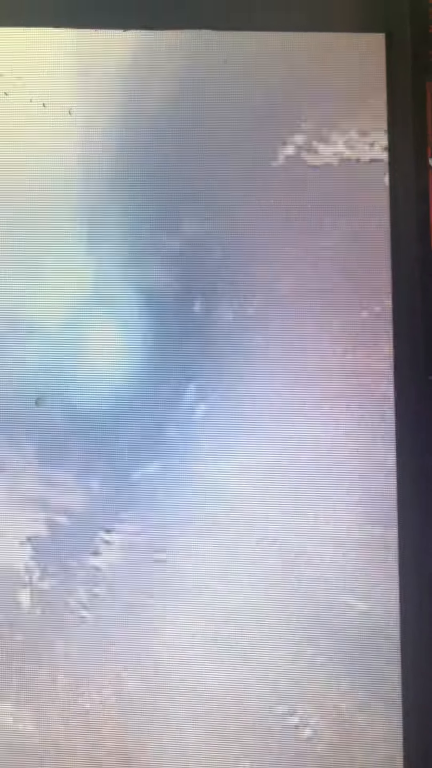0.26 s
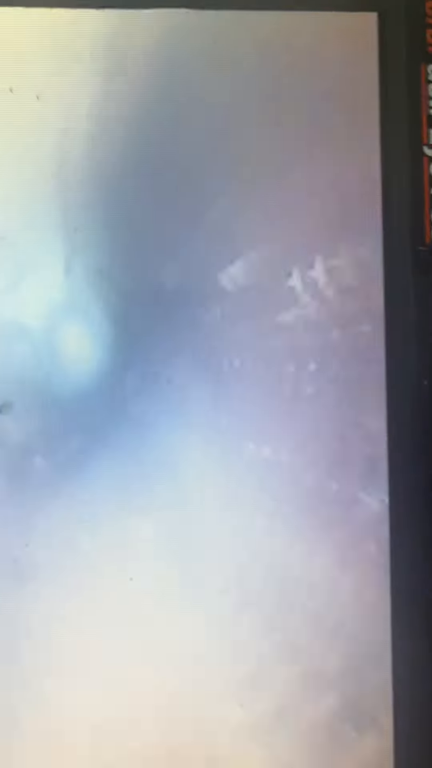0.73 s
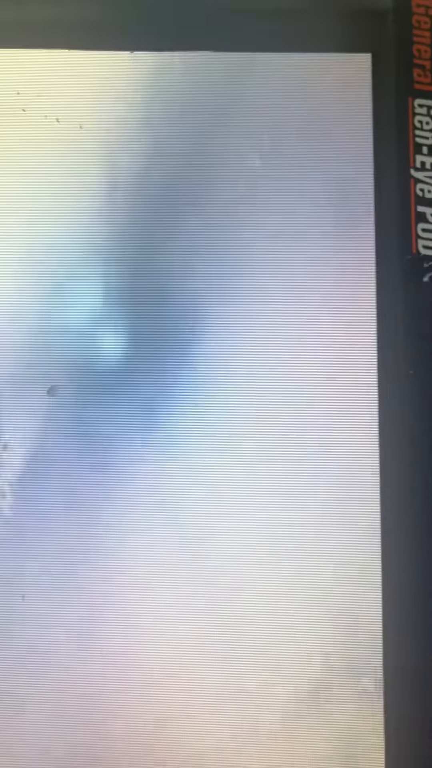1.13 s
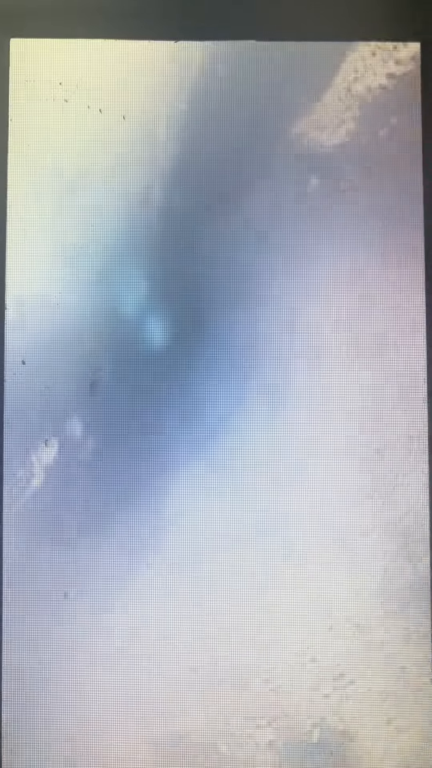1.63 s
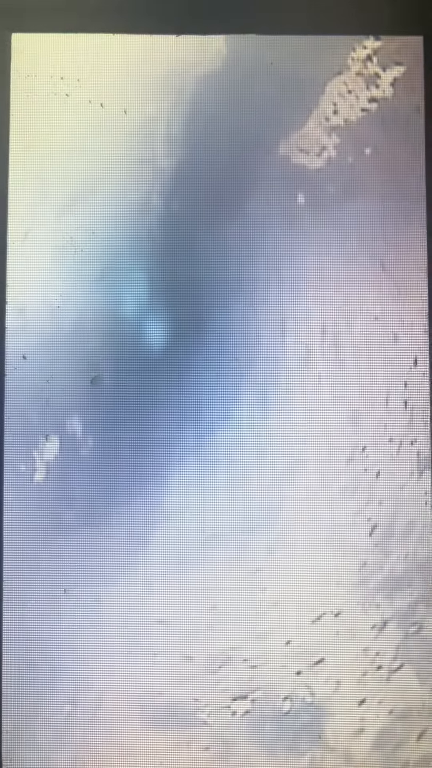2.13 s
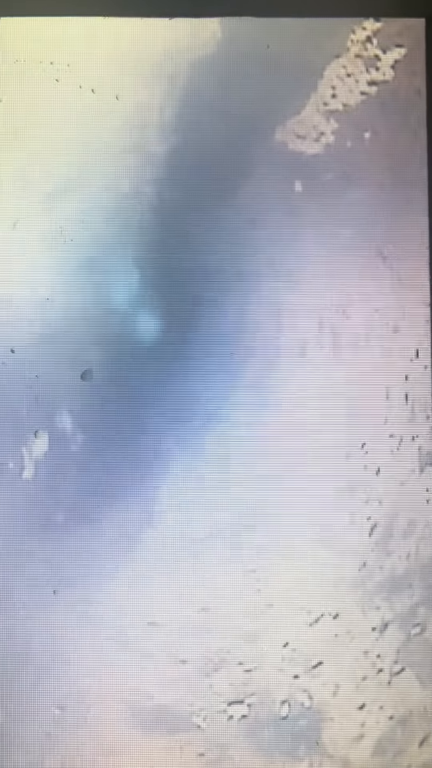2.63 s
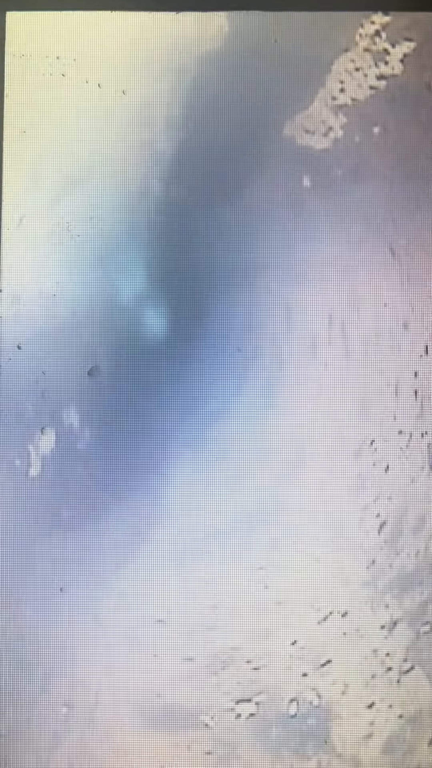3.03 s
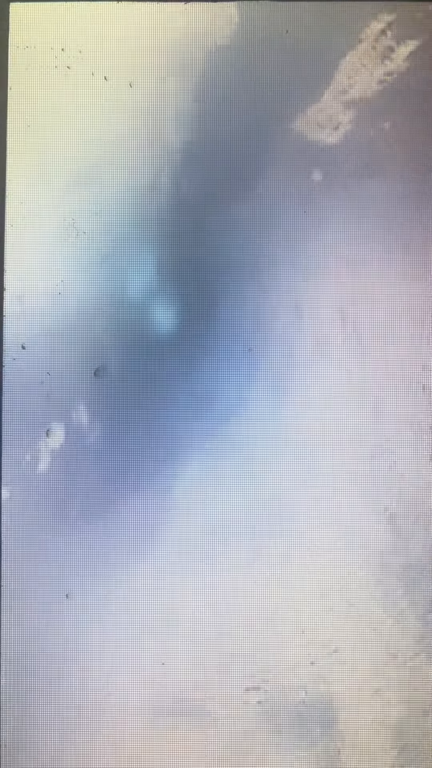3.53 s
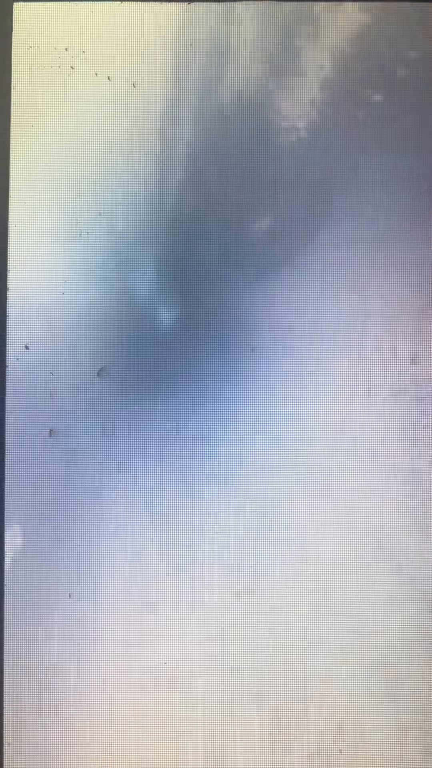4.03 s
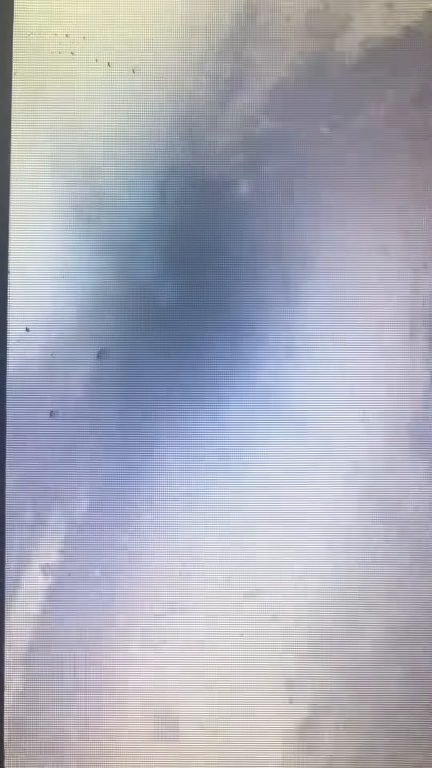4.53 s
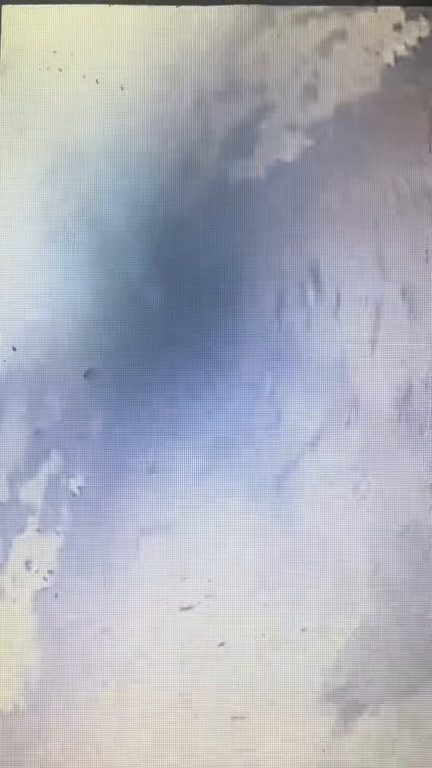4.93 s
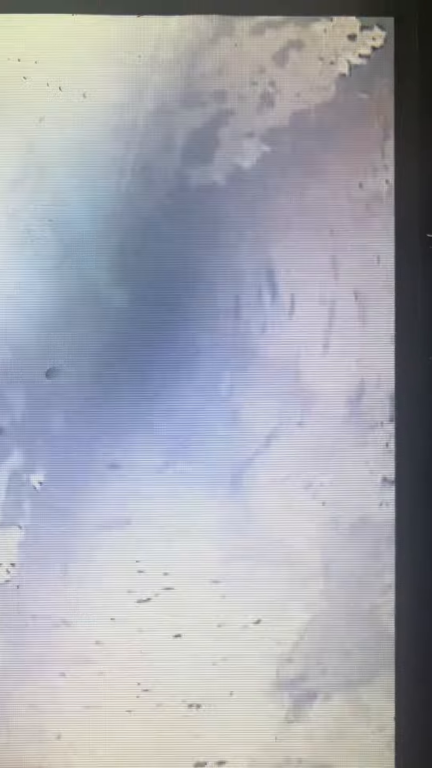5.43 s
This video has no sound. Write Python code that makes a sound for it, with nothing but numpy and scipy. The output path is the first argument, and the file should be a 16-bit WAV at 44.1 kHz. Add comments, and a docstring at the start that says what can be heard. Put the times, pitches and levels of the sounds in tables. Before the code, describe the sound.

A drain cable scrapes along a hollow pipe mouth in two clear pulls, the second shorter and louder, with a quieter stretch of light rubbing between them. Irregular springy slaps and knocks come from the cable hitting its reel, mixed with sharp ticks of grit and three low thuds. The sounds are near the microphone in a small, fairly dry room, with constant hiss and a low rumble underneath.

```python
"""Drain cable and reel

A springy push cable is drawn by hand out of a drain and fed back onto its reel in a small room. Each pull rubs
it along the hollow pipe mouth. It slaps the reel, and the slaps run down the cable as short falling chirps.
Grit ticks and crunches, slack loops knock and dull low thuds sound, all over a low rumble and a steady hiss."""
import sys
import numpy as np
from scipy import signal
from scipy.fft import rfft, irfft, next_fast_len
from scipy.io import wavfile
from scipy.ndimage import uniform_filter1d

SR = 44100
rng = np.random.default_rng(int(sys.argv[2]) if len(sys.argv) > 2 else 0)


def output_pcm(signal):
    """Save a mono or channel-first signal as 16-bit PCM at the path in sys.argv[1].

    Samples are clipped to [-1, 1] before scaling.
    """
    pcm = np.clip(np.atleast_2d(signal).T, -1, 1) * 32767
    wavfile.write(sys.argv[1], SR, np.round(pcm).astype(np.int16))


N = 249606
TIME = np.arange(N) / SR
FFT_SIZE = next_fast_len(N + SR)
HZ = np.maximum(np.arange(FFT_SIZE // 2 + 1) * SR / FFT_SIZE, 1)
TRAVEL_S = 0.003543   # sets how widely the bending waves spread on their way to the reel; a 1 kHz wave trails the front by about a third of this


def from_db(db):
    """Decibels to gain."""
    return 10 ** (np.asarray(db) / 20)


def rms_one(x):
    """Scale to rms 1."""
    return x / np.sqrt(np.mean(x ** 2) + 1e-20)


def steady(x, span_s):
    """Even out surges slower than span_s and leave the grain; rms about 1."""
    return x / np.sqrt(uniform_filter1d(x ** 2, int(span_s * SR)) + .05 * np.mean(x ** 2))


def over_hz(points):
    """Join a table's points by lines on a log-frequency axis."""
    hz, value = np.transpose(points)
    return np.interp(np.log(HZ), np.log(hz), value)


def filtered(x, response):
    """Pass x through a frequency response."""
    return irfft(rfft(x, FFT_SIZE) * response, FFT_SIZE)[..., :N]


def band(x, low_hz, high_hz):
    """Causal band-pass."""
    sos = signal.butter(2, [low_hz, min(high_hz, .45 * SR)], "band", fs=SR, output="sos")
    return signal.sosfilt(sos, x)


def minimum_phase(gain_db):
    """An EQ curve that sounds as early as it can, but never before its cause."""
    cepstrum = irfft(np.log(from_db(gain_db)))
    cepstrum[1:] *= 2
    cepstrum[len(cepstrum) // 2:] = 0
    return np.exp(rfft(cepstrum))


def drift(per_s):
    """A smooth random wander of rms 1."""
    return rms_one(filtered(rng.standard_normal(N), np.exp(-(HZ / per_s) ** 2)))


def grains(per_s, spread_db):
    """Clicks at random moments, a few far stronger than the rest."""
    sizes = from_db(spread_db * np.minimum(rng.exponential(1, N), 4)) * rng.choice([-1, 1], N)
    return sizes * (rng.random(N) < per_s / SR)


# The rumble's tone. Each row: frequency in Hz, relative level in dB.
RUMBLE_SPECTRUM = [(20, -41), (35, -25), (50, -1.5), (65, 0.5), (95, 2.5), (140, -5), (190, -6.5),
                   (260, -16), (500, -17.5), (1000, -32.5)]
def rumble(level_db=-36.5, pull_lift_db=2.0):
    """A low, steady bed that swells a little during a pull."""
    noise = filtered(rng.standard_normal(N), from_db(over_hz(RUMBLE_SPECTRUM)))
    return steady(noise, span_s=0.15) * from_db(level_db + pull_lift_db * pulling())


# The hiss's tone. Each row: frequency in Hz, relative level in dB.
HISS_SPECTRUM = [(200, 17), (900, -10), (1800, 8.5), (2300, 2.5), (3200, 11), (4200, 9), (5500, 8.5),
                 (7200, 6.5), (10000, 3), (14000, -0.5), (16000, -5)]
# Its stereo image. Each row: frequency in Hz, likeness of the sides from 0 (wide) to 1 (mono).
HISS_IMAGE = [(300, 0.73), (900, 0.061), (1600, 0.77), (3000, 1), (4200, 0.88), (6100, 1), (7500, 0.63),
              (9000, 0.98), (11000, 0.42), (12500, 1), (14200, 0.38), (15500, 0.3)]
def hiss(level_db=-46.5, flutter_db=2.5):
    """Broad hiss that flutters slightly, partly shared by the two sides."""
    alike = np.clip(over_hz(HISS_IMAGE), 0, .99)
    colour = from_db(over_hz(HISS_SPECTRUM))
    mid = filtered(rng.standard_normal(N), colour * np.sqrt(1 + alike))
    side = filtered(rng.standard_normal(N), colour * np.sqrt(1 - alike))
    return from_db(level_db + flutter_db * drift(per_s=25)) * rms_one(mid + side * [[1], [-1]])


# The ring of cable and reel. Each row: pitch in Hz, bandwidth in Hz, relative level in dB.
REEL_MODES = [(140.4, 9.8, 9.5), (183.4, 13.5, 3), (208.5, 14, -4), (336.5, 43, 4.5), (436, 86, -0.5),
              (472.3, 38.3, 2), (544, 65, -4), (622.4, 27.5, 0), (760, 115, -7.5), (974, 70, -5.5),
              (1129, 17, -10.5), (1225, 17, -4), (1319, 26, -11.5), (1397, 33, -2.5), (1485, 50, -11.5),
              (1635, 18, -10.5), (1936, 110, -12), (2070, 30, -12), (3250, 410, -26), (5120, 100, -28)]
def reel(hz, damping, uneven_db):
    """The reel's resonances, alternating in sign; each contact point weights them anew."""
    weights = from_db(uneven_db * rng.standard_normal(len(REEL_MODES)))
    response = 0
    for k, (mode_hz, width_hz, db) in enumerate(REEL_MODES):
        detuning = (hz ** 2 - mode_hz ** 2) / (hz * width_hz * damping)
        response += (-1) ** k * weights[k] * from_db(db) / (1 + 1j * detuning)
    return response


def reel_notch(hz, dip_hz=2400, octaves=0.098, dip_db=-8.0):
    """The reel radiates poorly just above its main resonances."""
    return from_db(dip_db * np.exp(-(np.log2(hz / dip_hz) / octaves) ** 2))


def bending(hz, travel_s, front_hz=2200):
    """Bending waves speed up as the root of frequency, so the lows trail in a falling chirp."""
    cycles = travel_s * np.sqrt(1000) * (2 * np.sqrt(hz) - hz / np.sqrt(front_hz))
    return np.exp(-2j * np.pi * cycles)


def slack(knock_db=-55.0, brush_db=-57):
    """Loose loops of cable knock and brush lightly against the reel all the time."""
    contacts = grains(per_s=80, spread_db=1.9)
    path = reel_notch(HZ) * bending(HZ, TRAVEL_S)
    taps = filtered(contacts, reel(HZ, damping=1.5, uneven_db=2.5) * path)
    knock = from_db(knock_db) * rms_one(band(taps, 454, 760))
    brush = from_db(brush_db) * rms_one(band(taps, 1590, 3700))
    return knock + brush


def crunch(level_db=-56.5, resting=0.34, crumble_s=0.0031):
    """Fine grit crunches between hand and cable, most of all during a pull."""
    snaps = np.abs(grains(per_s=45, spread_db=4)) + 1e-18
    envelope = signal.lfilter([1], [1, -np.exp(-1 / (crumble_s * SR))], snaps)
    grit = rms_one(band(envelope * rng.standard_normal(N), 1800, 8700))
    return from_db(level_db) * grit * (resting + pulling())


# The pulls; the faint one is slack being fed back. Each row: start, full speed, slowing and stop
# in seconds, body level in dB, rasp level in dB, pitch of the pipe mouth in Hz.
PULLS = [(0.067, 0.453, 1.1, 1.706, -33, -47, 514.6), (1.58, 1.793, 2.3, 2.9, -50.5, -55, 495),
         (3.52, 4.14, 4.24, 4.76, -29.5, -41, 491)]
def rubbing(grip_s=0.05, surge_db=3.2, rasp_follows=0.74):
    """Tiny slips shake the reel in stick-slip surges: a hollow body under a bright rasp."""
    path = reel_notch(HZ) * bending(HZ, TRAVEL_S)
    out = 0
    for *times, body_db, rasp_db, mouth_hz in PULLS:
        slips = grains(per_s=1200, spread_db=4.8)
        shake = filtered(slips, reel(HZ, damping=0.83, uneven_db=2.0) * path)
        ring = pipe_mouth(shake, mouth_hz)
        # The hand's grip holds the scrape even; the rasp follows the speed less than the body does.
        body = from_db(body_db) * speed(times) * steady(band(shake + ring, 157, 670), grip_s)
        rasp = from_db(rasp_db) * speed(times) ** rasp_follows * steady(band(shake, 1010, 6100), grip_s)
        stick_slip = from_db(surge_db * np.tanh(drift(per_s=32)))
        out += (body + rasp) * stick_slip
    return out


def pipe_mouth(shake, pitch_hz, swing_hz=30, width_hz=80, gain=3.7):
    """The pipe mouth rings hollow at a pitch that shifts with the cable's angle."""
    low, high = (filtered(shake, 1 / (1 + (2 * (HZ - centre_hz) / width_hz) ** 2))
                 for centre_hz in (pitch_hz - swing_hz, pitch_hz + swing_hz))
    angle = .5 + .5 * np.tanh(2 * drift(per_s=12))
    return gain * ((1 - angle) * low + angle * high)


def speed(times):
    """The cable's speed in one pull, 0-1: it rises steadily, holds and falls."""
    return np.interp(TIME, times, [0, 1, 1, 0])


def pulling():
    """The cable's speed over all pulls, each weighted by its level, 0-1."""
    total = sum(from_db(body_db) * speed(times) for *times, body_db, _, _ in PULLS)
    return total / total.max()


# The loudest grit ticks. Each row: start in seconds, attack level in dB, pitch in Hz,
# crumble time in seconds.
GRIT_TICKS = [(0.079, -36, 3100, .004), (0.174, -31.5, 4700, .003), (0.272, -31, 8100, .003),
              (0.3365, -31, 5600, .0028), (0.436, -36.5, 4700, .003), (0.574, -31, 11000, .002),
              (0.6093, -32.5, 6000, .0023), (0.8735, -26, 3900, .003), (0.9224, -33, 3700, .003),
              (0.932, -33, 3300, .004), (1.193, -27, 8000, .0026), (1.391, -34, 4300, .003),
              (1.411, -29, 8500, .003), (1.6248, -33, 2400, .005), (1.71, -34, 11000, .0025),
              (2.089, -36.5, 4600, .003), (2.3125, -31, 3400, .004), (2.5052, -36, 4500, .003),
              (2.9553, -28, 11500, .0019), (3.0247, -32.5, 5200, .0019), (3.8152, -17.5, 9800, .0025),
              (3.8355, -32, 3800, .006), (3.8925, -37, 9050, .0017), (5.087, -32.5, 5000, .0025),
              (5.3528, -36, 3800, .002)]
def ticks(ring_db=15, fine_db=-58.0, fine_hz=7500, band_ratio=1.28):
    """Grit snaps on the cable in crumbling bursts over a fine crackle; coarse grit rings the reel."""
    t = TIME[:SR // 30]
    snaps = np.zeros((2, N))
    for start_s, db, pitch_hz, crumble_s in GRIT_TICKS:
        noise = rng.standard_normal((2, len(t)))
        burst = rms_one(band(noise, pitch_hz / band_ratio, pitch_hz * band_ratio))
        start = round(start_s * SR)
        snaps[:, start:start + len(t)] += from_db(db) * burst * np.exp(-t / crumble_s)
    ring = filtered(band(snaps, 3900, 7500), reel(HZ, damping=0.43, uneven_db=7))
    fine = band(grains(per_s=99, spread_db=3.9), fine_hz / band_ratio, fine_hz * band_ratio)
    return snaps + from_db(ring_db) * ring + from_db(fine_db) * rms_one(fine)


# Dull low thuds. Each row: start in seconds, envelope peak in dB, pitch in Hz.
LOW_THUDS = [(0.242, -26, 79), (2.445, -27, 125), (4.632, -20, 137)]
def thuds(swell_s=0.005):
    """Each thud swells and dies within a few cycles."""
    out = 0
    for start_s, peak_db, pitch_hz in LOW_THUDS:
        age = np.maximum(TIME - start_s, 0)
        envelope = age / swell_s * np.exp(1 - age / swell_s)
        out -= from_db(peak_db) * envelope * np.sin(2 * np.pi * pitch_hz * age)
    return out


def slap(hz, lead, echo_db, echo_s=.012, boom_db=4.0, boom_s=.029, chatter_s=0.0065):
    """A chattering hit runs down the cable, echoes off the next bend and booms back from the coil."""
    length = 2 * (len(hz) - 1)
    chatter = band(rng.standard_normal(length), 800, 7400) * np.exp(-TIME[:length] / chatter_s)
    contact = np.roll(signal.unit_impulse(length) + 0.26 * chatter, lead)
    chirp = bending(hz, TRAVEL_S)
    echo_delay = np.exp(-2j * np.pi * hz * echo_s * rng.uniform(.7, 1.3))
    echo = from_db(echo_db) * bending(hz, 2 * TRAVEL_S) * echo_delay
    boom_delay = np.exp(-2j * np.pi * hz * boom_s * rng.uniform(0.844, 1.153))
    boom = from_db(boom_db) / (1 + 1j * hz / 160) ** 3 * chirp * boom_delay   # only the lows return
    direct = from_db(-7) * hz / (hz + 300)   # the thin cable itself radiates little bass
    ring = from_db(echo_db + 12) * reel(hz, damping=0.82, uneven_db=3)   # grows with the echo
    body = (ring + direct) * reel_notch(hz)
    return irfft(rfft(contact) * (chirp + echo + boom) * body)


# The seven bands of the slap EQ. Each entry: a band edge in Hz.
SLAP_BAND_EDGES = [110, 250, 410, 620, 880, 1250, 2200, 6000]
# The tone of an average slap. Each entry: one band's relative level in dB.
SLAP_BAND_DB = [-1.7, -5.5, -2.5, -11, -13, -13, -19]
def slap_colour(hardness, pitch_hz, boom_db, favour_db=8, favour_octaves=0.4):
    """dB per band: hard landings are brighter, the landing point favours a pitch, the coil booms."""
    centres = np.sqrt(np.multiply(SLAP_BAND_EDGES[:-1], SLAP_BAND_EDGES[1:]))
    tilt = hardness * np.log2(centres / 500)
    favoured = favour_db * np.exp(-(np.log2(centres / pitch_hz) / favour_octaves) ** 2)
    boom = boom_db * (centres == centres[0])
    return np.array(SLAP_BAND_DB) + tilt + favoured + boom


# The cable's slaps. Each row: start in seconds, base level in dB, hardness in dB per octave,
# favoured pitch in Hz, coil boom in dB, send to the echo and the reel's ring in dB.
CABLE_SLAPS = [(0.249, -36, 2, 910, 1, -35), (0.721, -31.5, 0, 1560, -1, -16.5),
               (0.76, -32.5, -4.5, 480, -1, -11), (0.812, -39.5, -4, 350, -4, -23),
               (0.828, -33, -3, 360, -2.5, -21), (0.875, -38.5, 3.5, 198, 5, -10.5),
               (0.923, -38, 1.5, 198, 1, -11), (0.948, -36, 1, 1380, 4, -16),
               (1.056, -38.5, -4, 466, -12.5, -20), (1.229, -45, -1.5, 408.7, -4, -24),
               (1.394, -31.5, -2, 327, -5.5, -13), (1.468, -32, 0, 870, -10, -28),
               (1.624, -56.5, 5, 1700, -17, -14), (2.119, -43, 1.5, 360, 5, -8),
               (2.313, -30.5, -0.2, 1540, 0.5, -17), (2.458, -35.5, -2.8, 1013, -13, -16),
               (2.645, -48, -5, 740, -11, -11), (2.803, -54, 3, 740, -11, -22),
               (2.854, -55.5, 5, 1700, -13, -13), (3.177, -43.5, 0.5, 410, -11, -22),
               (3.838, -28, 2.5, 1840, 2, -15), (3.843, -29.5, -3.5, 317, -3.5, -12),
               (4.144, -38, -4, 465, -5.5, -17), (4.396, -40.5, -3, 590, -19, -11),
               (4.48, -36.5, -4.5, 480, -16, -20), (4.589, -29.5, 0.9, 684, -7, -25),
               (4.602, -32, -5, 317, -2, -13), (4.826, -44.5, -1, 726, -4, -18),
               (5.085, -28, -1, 370, -3.5, -10.5), (5.12, -36.5, -0.5, 294, -2.5, -2.5),
               (5.571, -31.5, 0.3, 1480, -2, -11.5), (5.575, -44.5, -1.5, 520, -13, -4)]
def slaps(rise_s=.0005):
    """The cable hits the reel; where and how hard it lands sets each slap's strength and colour."""
    lead, length, attack = SR // 100, 2 ** 14, SR // 21   # samples
    hz = np.maximum(np.arange(length // 2 + 1) * SR / length, 1)
    bands = list(zip(SLAP_BAND_EDGES, SLAP_BAND_EDGES[1:]))
    log_centres = np.log(bands).mean(axis=1)
    out = np.zeros(N + length)
    for start_s, db, hardness, pitch_hz, boom_db, echo_db in CABLE_SLAPS:
        hit = slap(hz, lead, echo_db)
        colour_db = db + slap_colour(hardness, pitch_hz, boom_db)
        for _ in range(2):   # neighbouring bands overlap, so the EQ takes two passes
            attack_rms = [np.std(band(hit, low, high)[lead:lead + attack]) for low, high in bands]
            eq_db = np.interp(np.log(hz), log_centres, colour_db - 20 * np.log10(attack_rms))
            hit = irfft(rfft(hit) * minimum_phase(eq_db))
        start = round((start_s - rise_s) * SR) - lead
        out[start:start + length] += hit
    return out[:N]


def room(x, wet_db, t60_s=0.099, treble_share=0.7, width=0.29):
    """Dry sound plus a short, narrow stereo tail that dies sooner in the treble."""
    t = TIME[:SR // 2]
    mid, side = rng.standard_normal((2, len(t)))
    noise = (mid + width * side * [[1], [-1]]) * (t > .005)   # 5 ms of pre-delay
    lows = band(noise, 127, 1260) * from_db(-60 * t / t60_s)
    highs = band(noise, 1920, 8500) * from_db(-60 * t / (t60_s * treble_share))
    tail = lows + highs
    tail /= np.sqrt(np.sum(tail ** 2) / 2)
    return x + from_db(wet_db) * signal.fftconvolve(np.atleast_2d(x), tail, axes=1)[:, :N]


def scene():
    """Cable and grit in the room, with dry thuds, over a bed of rumble and hiss."""
    friction = room(rubbing() + slack(), wet_db=-10.5)
    hits = room(slaps(), wet_db=-12.0)
    grit = room(ticks() + crunch(), wet_db=-13.0)
    return friction + hits + grit + thuds() + rumble() + hiss()


# Phase between left and right, by frequency. Each row: frequency in Hz, the left's lead in radians.
STEREO_PHASE = [(0, 0), (520, -1.0), (1720, 0.06), (2930, 2.46), (3530, 1.91), (4480, 1.12), (5770, 2.42),
                (6800, 3.53), (8350, 6.3), (10200, 5.3), (11200, 8.98), (13700, 9.6), (14600, 11.5),
                (16300, 10.5)]
# The stereo balance. Each row: frequency in Hz, left minus right in dB.
STEREO_BALANCE = [(60, 0.5), (110, -0.5), (200, -2.5), (380, -1.5), (700, -9), (1290, -1.5), (2380, -0.5),
                  (4400, -0.5), (8120, 0.0), (15000, -0.5)]
def record(dry, cutoff_hz=15900):
    """The two channels differ in phase and level, widening the sound; the top end is cut steeply."""
    phase = np.interp(HZ, *np.transpose(STEREO_PHASE))
    left = from_db(over_hz(STEREO_BALANCE) / 2)
    right = np.exp(-1j * phase) / left
    high_cut = 1 / np.sqrt(1 + (HZ / cutoff_hz) ** 200)
    return filtered(dry, np.array([left, right]) * high_cut)


dry = scene()
out = record(dry)
output_pcm(out)
```